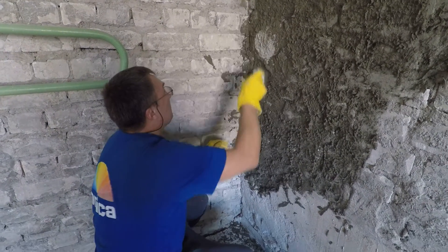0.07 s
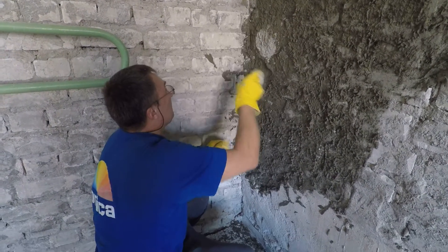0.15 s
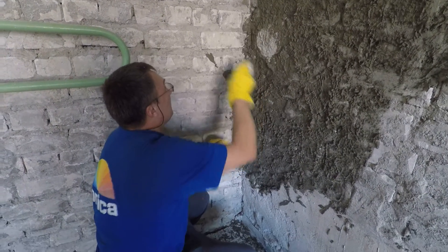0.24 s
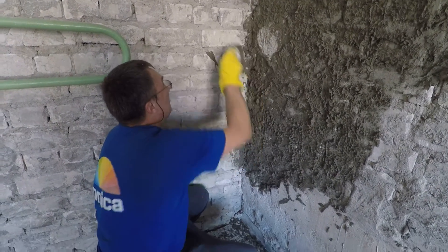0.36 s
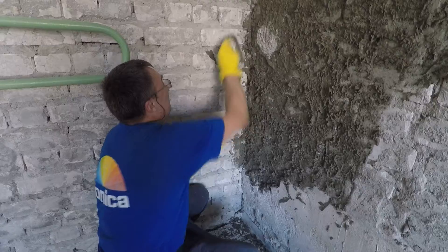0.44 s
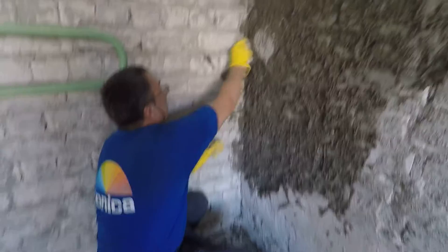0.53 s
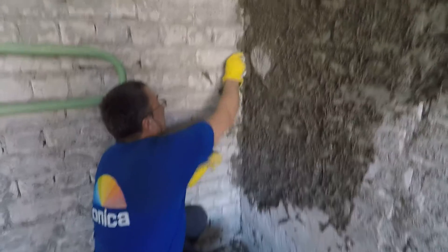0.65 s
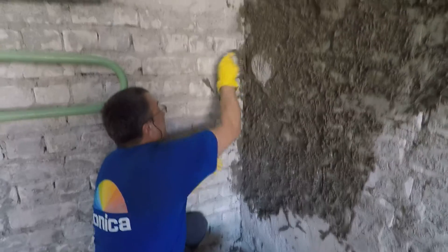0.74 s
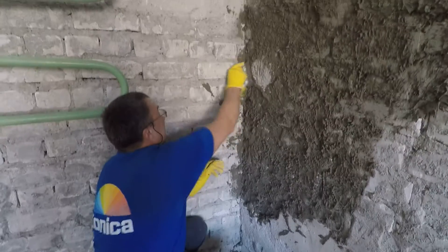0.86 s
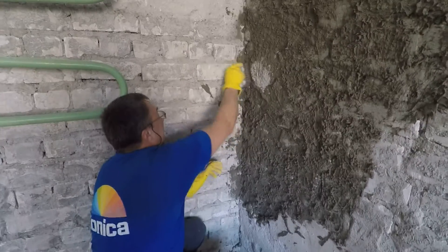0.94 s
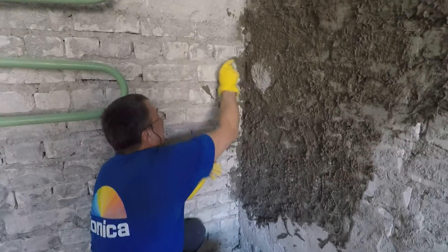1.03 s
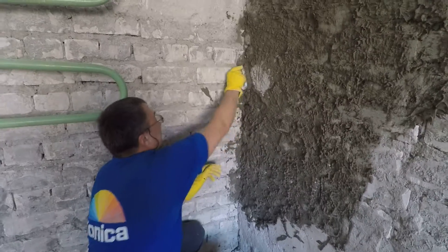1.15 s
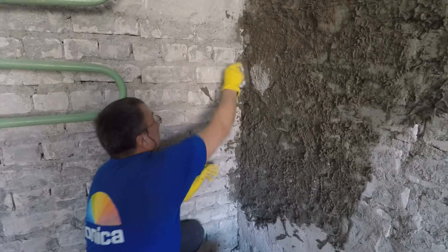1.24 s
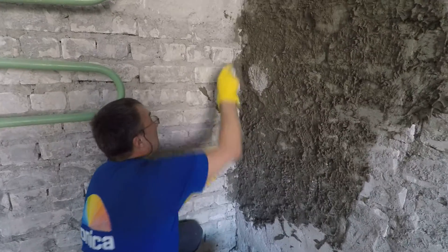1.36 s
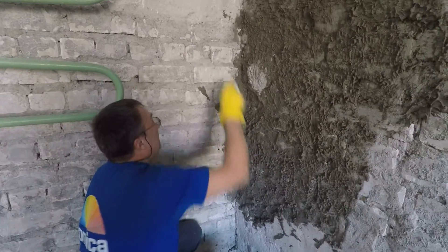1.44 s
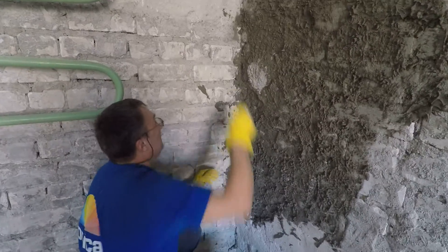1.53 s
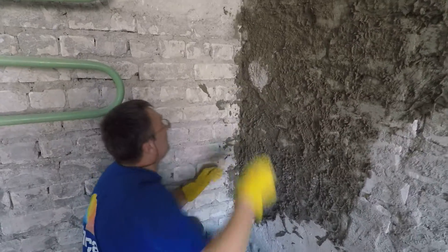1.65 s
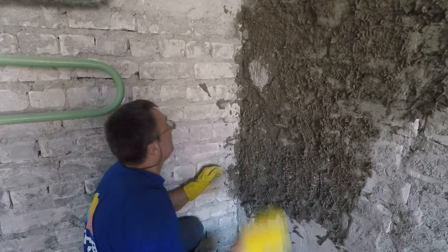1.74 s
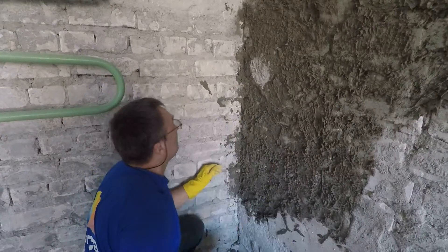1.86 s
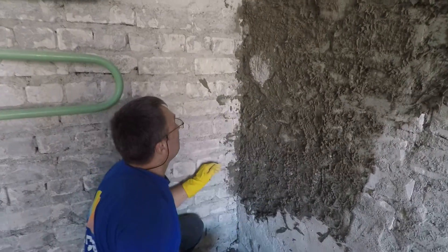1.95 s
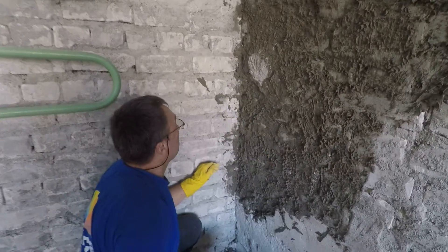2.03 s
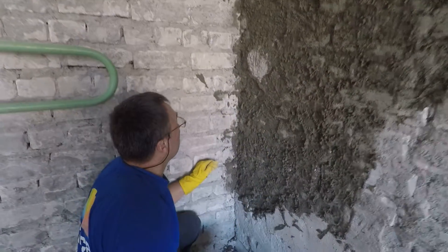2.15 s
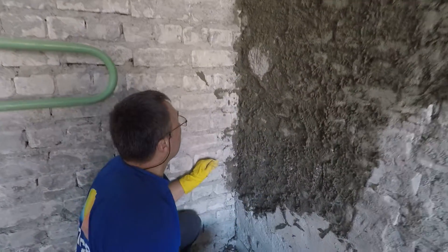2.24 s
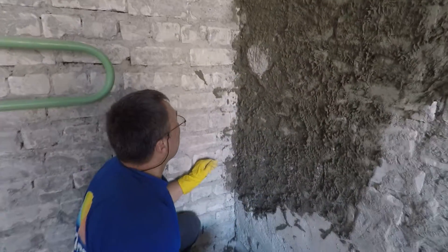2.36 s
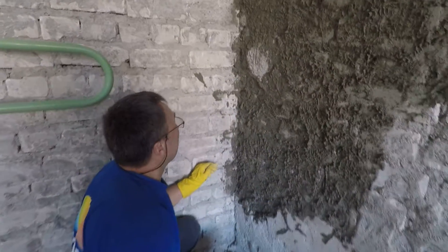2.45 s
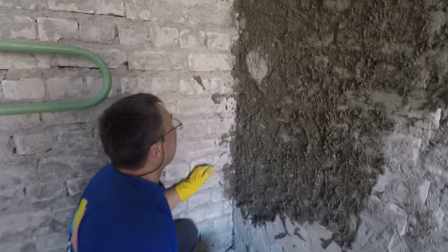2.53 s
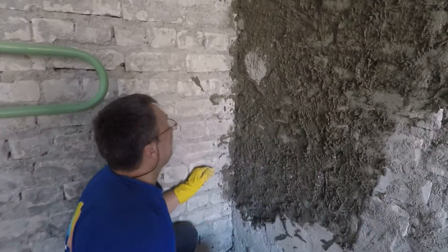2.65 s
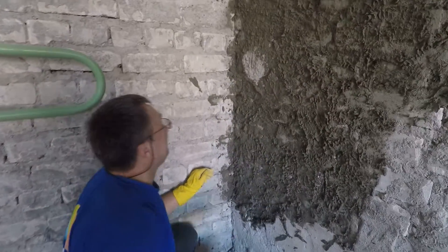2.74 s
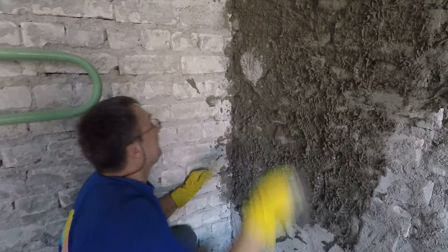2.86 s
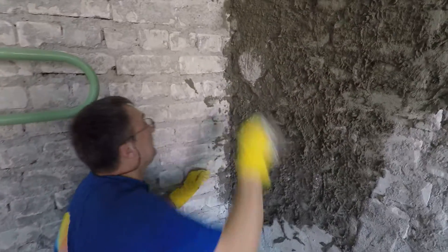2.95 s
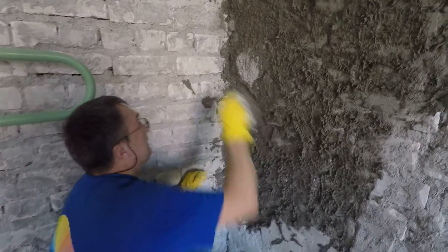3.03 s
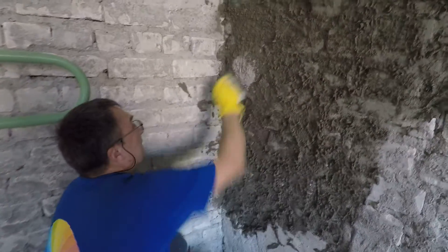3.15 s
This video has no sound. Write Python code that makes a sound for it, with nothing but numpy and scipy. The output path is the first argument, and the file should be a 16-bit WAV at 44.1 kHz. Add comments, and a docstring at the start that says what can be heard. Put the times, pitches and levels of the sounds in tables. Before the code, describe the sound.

Wet plaster slaps onto a brick wall three times, at about 0.6, 0.9 and 1.1 seconds, each a short wet crack with a dull thud and crumbs, ringing in a bare room. A tool scrapes softly in gritty mix near the start, knocks lightly at 2.2 seconds and scrapes again at 2.7. Low rumble and bumps from the moving microphone and a faint hiss lie underneath.

```python
"""In a bare, hard room, wet cement plaster is flung onto a brick wall three times.
Each slap is a short wet crack with a dull thud and a spray of crumbs; the room rings after it.
A tool scrapes softly in the gritty mix before, between and after the slaps, and knocks once.
Air and handling make the moving microphone rumble and bump, over a faint hiss."""
import sys
import numpy as np
from scipy import signal
from scipy.fft import rfft, irfft
from scipy.io import wavfile
from scipy.ndimage import uniform_filter1d

SR = 44100
rng = np.random.default_rng(int(sys.argv[2]) if len(sys.argv) > 2 else 0)


def wav_out(sig):
    """Save sig, one row per channel (or a flat mono array), as 16-bit PCM at SR to the path in sys.argv[1]."""
    wavfile.write(sys.argv[1], SR, np.round(np.clip(np.atleast_2d(sig).T, -1, 1) * 32767).astype(np.int16))


N = 141120
T = np.arange(N) / SR
HZ = np.fft.rfftfreq(N, 1 / SR)


def amp(db):
    """Turns decibels into a number to multiply by."""
    return 10 ** (np.asarray(db) / 20)


def read(points, hz=HZ):
    """Joins a table's points with straight lines on a log frequency scale."""
    frequencies, values = np.transpose(points)
    return np.interp(np.log(hz + 1), np.log(frequencies + 1), values)


def hump(hz, octaves):
    """A bell shape of height 1 around one frequency."""
    return np.exp(-.5 * (np.log2((HZ + 1) / hz) / octaves) ** 2)


def unit(x):
    """Scales a sound so its energy is 1."""
    return x / np.sqrt(np.sum(x ** 2) + 1e-20)


def add(mix, start_s, sound):
    """Mixes a sound in at the given time."""
    part = mix[max(round(start_s * SR), 0):]
    part += sound[:len(part)]


def colour(x, db):
    """Turns each frequency up or down by the given decibels."""
    cepstrum = irfft(np.log(amp(db)), N)
    # Folding onto the first half makes the filter ring after a hit, not before.
    cepstrum[1:N // 2] *= 2
    cepstrum[N // 2 + 1:] = 0
    return irfft(rfft(x) * np.exp(rfft(cepstrum)), N)


def whiten(x):
    """Evens out a burst from bass to treble, keeping its timing and fine detail."""
    spectrum = rfft(x)
    power = abs(uniform_filter1d(abs(spectrum) ** 2, 600))
    return unit(irfft(spectrum / np.sqrt(power + 1e-12), N))


def noise(points):
    """Steady noise with the given tone and an average (rms) level of 1."""
    spectrum = rfft(rng.standard_normal(N)) * amp(read(points))
    return unit(irfft(spectrum, N)) * np.sqrt(N)


def grains(per_s):
    """Random clicks of uneven size."""
    return rng.standard_normal(N) * (rng.random(N) < per_s / SR)


def hiss():
    """A faint, steady hiss in the background."""
    # Each row: frequency in Hz, relative level in dB.
    tone = [(20, -8), (120, 13), (200, 9), (300, 7), (500, 3.5), (1000, 1.5), (2000, 1), (3000, 2.5),
            (4500, -1), (5700, -3), (8000, -7.5), (15000, -10.5)]
    return amp(-63.5) * noise(tone)


def rumble():
    """Air and handling shake the moving microphone: a wavering rumble with low bumps."""
    # Each row: frequency in Hz, relative level in dB.
    tone = [(8, -30), (20, 2.5), (35, -2.5), (55, -5.5), (80, -12), (120, -21), (200, -41.5), (500, -67),
            (2000, -95)]
    # Each row: time in seconds, rumble level in dB.
    levels = [(0, -54), (.45, -53), (.58, -46.5), (.8, -48.5), (1.3, -47), (1.55, -51), (1.95, -53),
              (2.1, -49), (2.3, -50), (2.45, -46), (2.75, -50), (3.2, -53)]
    # Each row: start in seconds, peak level in dB, pitch in Hz, fade time in seconds.
    bumps = [(0.582, -33, 64, .016), (2.030, -51, 92, .014), (2.075, -40, 42, .015), (2.372, -39, 42, .028),
             (2.37, -46, 85, .018)]
    out = amp(np.interp(T, *np.transpose(levels))) * noise(tone)
    for start_s, db, hz, fade_s in bumps:
        swell = T / fade_s * np.exp(1 - T / fade_s)
        add(out, start_s, amp(db) * swell * np.sin(2 * np.pi * hz * T))
    return out


def scrape(db, rise_s, fall_s, centre_hz):
    """Wet grit slides over the tool in a quick rush of tiny clicks."""
    # Each row: frequency in Hz, boost or cut in dB.
    grit_tone = [(150, -33), (800, -18), (1400, -2), (4000, -7.5), (6000, -5), (10000, -15), (15000, -26)]
    stroke = np.minimum(T / rise_s, 1) * np.exp(-np.maximum(T - rise_s, 0) / fall_s)
    grit = unit(grains(per_s=3400) * stroke)
    return amp(db) * colour(grit, read(grit_tone) + 11 * hump(centre_hz, octaves=0.35))


def room(x):
    """Quick echoes bounce off the near corner, then a long ring dies away, treble first."""
    # Each row: frequency in Hz, seconds the ring takes to fall by 60 dB.
    ring_times = [(120, 1.33), (300, 1.02), (700, 0.9), (1700, 0.82), (3200, 0.66), (5500, 0.6),
                  (9000, 0.46), (15000, 0.181)]
    # Each row: frequency in Hz, boost or cut of the echoes in dB.
    wall_tone = [(100, 4), (1000, 2), (2000, -1), (3500, -1), (5000, -5.5), (10000, -0.5)]
    echo_delay_s, echo_fade_s, build_s = 0.005, 0.022, 0.016
    echoes = whiten(grains(per_s=3000) * (T > echo_delay_s) * np.exp(-T / echo_fade_s))
    mid_ring_s = ring_times[2][1]
    build_up = np.clip(T / build_s - .5, 0, 1)
    wash = whiten(rng.standard_normal(N) * build_up * amp(-60 * T / mid_ring_s))
    # Give each frequency its own fading speed.
    hz, times, bands = signal.stft(wash, SR, nperseg=256)
    extra_db = -60 * times * (1 / read(ring_times, hz)[:, None] - 1 / mid_ring_s)
    ring = signal.istft(bands * amp(extra_db), SR, nperseg=256)[1][:N]
    response = colour(amp(0.5) * echoes + amp(1.5) * ring, read(wall_tone))
    return signal.fftconvolve(x, response)[:N]


def crack(contact_s):
    """Dense clicks swell and die within milliseconds as two surfaces meet."""
    return unit(rng.standard_normal(N) * T / contact_s * np.exp(-T / contact_s))


def tool_ring():
    """Boosts in dB for the pitches that ring in slaps and knock alike, likely the tool's own."""
    # Each row: pitch in Hz, width in octaves, boost in dB.
    pitches = [(1393, 0.059, 6.5), (1704, 0.066, 8.5), (1900, 0.038, 2), (2500, 0.038, 3), (2890, 0.033, 4),
               (3120, 0.024, 5), (3420, 0.046, 5), (3990, 0.047, 7), (5600, 0.037, 5), (6400, 0.029, 3.5),
               (7630, 0.042, 3)]
    return sum(db * hump(hz, octaves) for hz, octaves, db in pitches)


def slap(db, contact_s, pocket_hz, pocket_db, thud_hz, thud_db, treble_db):
    """A lump flattens on the wall, squeezes out a pocket of air and sprays crumbs."""
    # Each row: frequency in Hz, boost or cut in dB.
    plaster_tone = [(60, -14.5), (160, -6.5), (400, -11.5), (800, -6), (1200, -7.5), (1500, -5), (2150, -2),
                    (3200, 1.5), (4100, -5), (4500, -6), (5600, -9), (7800, -17), (8700, -22),
                    (15000, -35.5)]
    spray_fade_s, treble_hz = 0.01, 5500
    spray = unit(grains(per_s=1500) * (1 - np.exp(-T / contact_s)) * np.exp(-T / spray_fade_s))
    burst = whiten(crack(contact_s) + amp(-13.5) * spray)
    pocket = pocket_db * hump(pocket_hz, octaves=0.17)
    thud = thud_db * hump(thud_hz, octaves=0.35)
    treble = treble_db * HZ ** 4 / (HZ ** 4 + treble_hz ** 4)
    return amp(db - 2) * colour(burst, read(plaster_tone) + tool_ring() + pocket + thud + treble)


def knock():
    """The tool taps down lightly and rings for a moment."""
    # Each row: frequency in Hz, boost or cut in dB.
    tone = [(150, -3.5), (600, -6.5), (900, -13), (1200, -3.5), (1450, -15), (1640, -1.5), (2000, -0.5),
            (4200, -7), (6000, -14.5), (10000, -21), (15000, -35)]
    return amp(-15.5) * colour(whiten(crack(contact_s=0.0017)), read(tone) + tool_ring())


def scene():
    """Mixes the slaps, the knock and the scrapes with their echoes, over hiss and rumble."""
    # Each row: start in seconds, relative level in dB, contact time in seconds, trapped air's pitch
    # in Hz and boost in dB, thud's pitch in Hz and boost in dB, treble boost in dB, echo gain in dB.
    slaps = [(0.5716, -1.5, 0.0015, 1790, 5.5, 535, 0.5, 2.5, -0.5),
             (0.8846, -4, 0.00077, 1720, 2.5, 395, 4.5, 2, 1.5),
             (1.143, 0, 0.00092, 2560, 5, 267, 5.5, 2, -1.5)]
    # Each row: start in seconds, relative level in dB, rise and fall in seconds, centre pitch in Hz.
    scrapes = [(0.135, -28, 0.023, .012, 3400), (0.267, -31.5, 0.0086, .008, 3030),
               (1.133, -19.5, 0.002, 0.011, 3370), (2.236, -29, 0.0023, 0.0091, 3800),
               (2.657, -19.5, 0.037, 0.012, 3060)]
    knock_start_s, knock_room_db = 2.2452, -3
    out = hiss() + rumble()
    hits = [(start_s, slap(*settings), room_db) for start_s, *settings, room_db in slaps]
    hits.append((knock_start_s, knock(), knock_room_db))
    for start_s, sound, room_db in hits:
        direct = np.roll(sound, round(start_s * SR))
        out += direct + amp(room_db) * room(direct)  # each spot has its own echoes
    scraping = np.zeros(N)
    for start_s, *settings in scrapes:
        add(scraping, start_s, scrape(*settings))
    return (out + scraping + amp(-2.5) * room(scraping))[None]


def record(dry):
    """Cuts off the very highest treble, above 15400 Hz."""
    low_pass = signal.firwin(511, 15400, window=("kaiser", 9), fs=SR)
    return signal.oaconvolve(dry, low_pass[None], "same")


dry = scene()
out = record(dry)
wav_out(out)
```